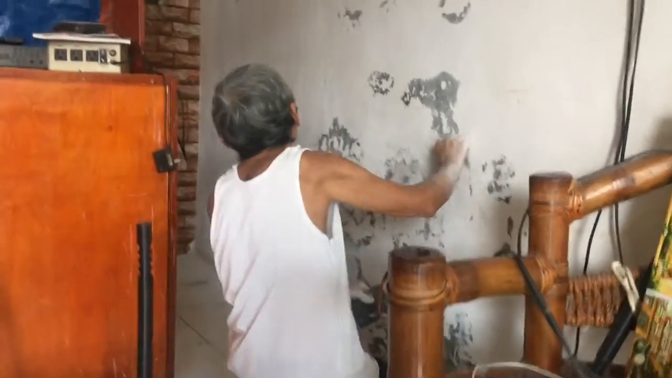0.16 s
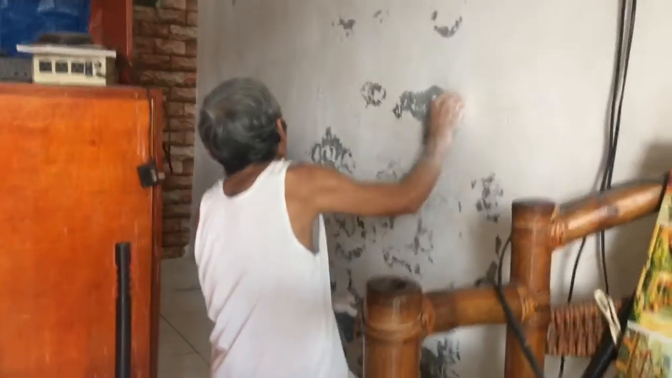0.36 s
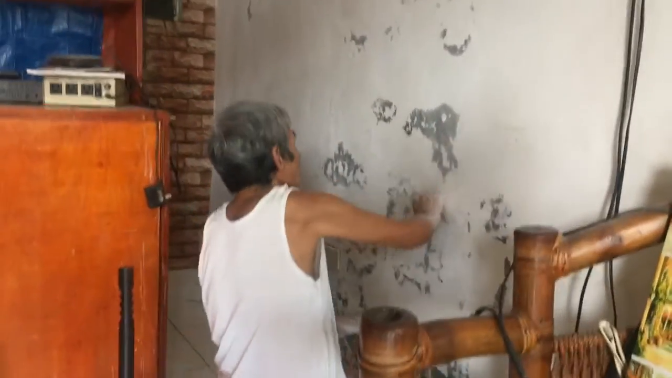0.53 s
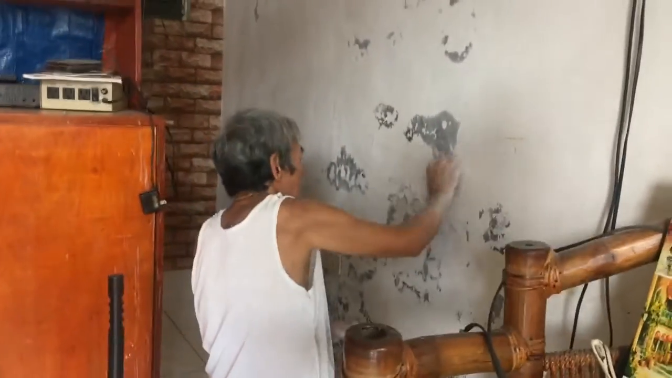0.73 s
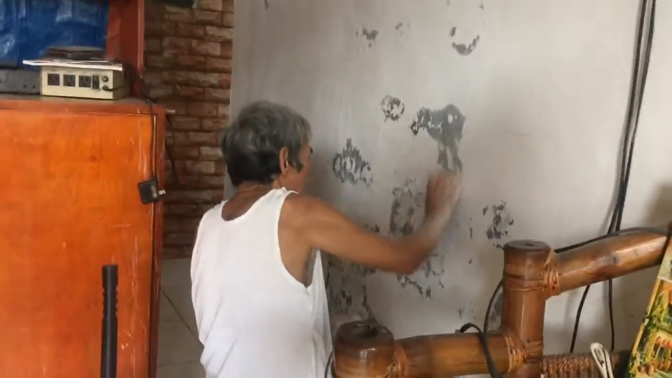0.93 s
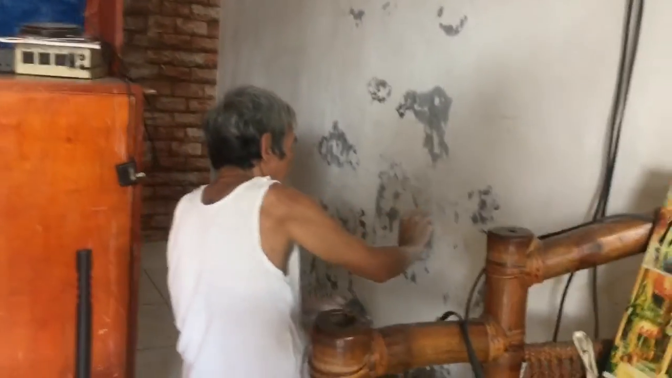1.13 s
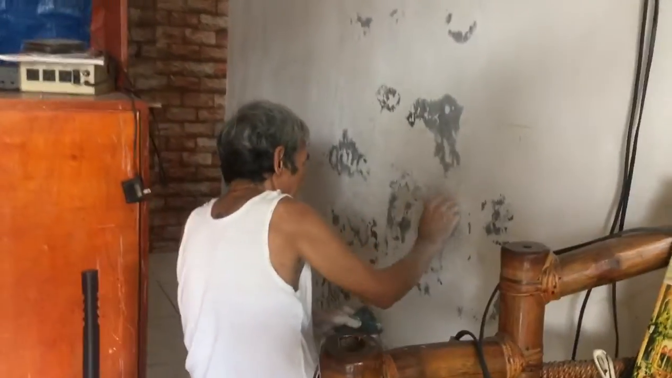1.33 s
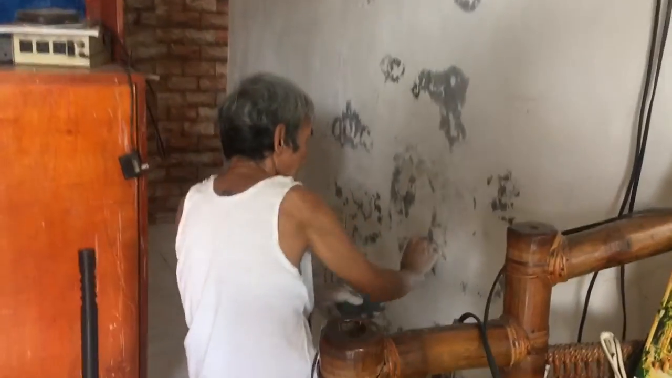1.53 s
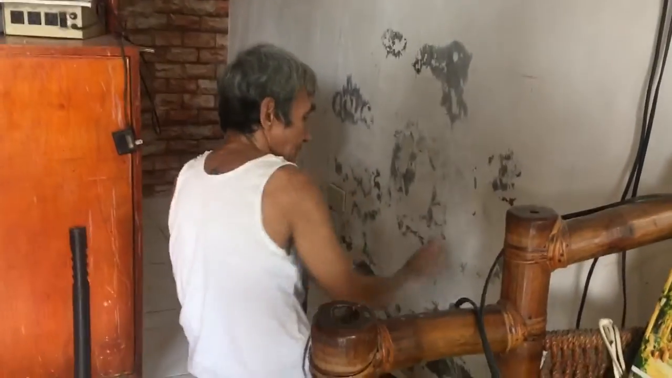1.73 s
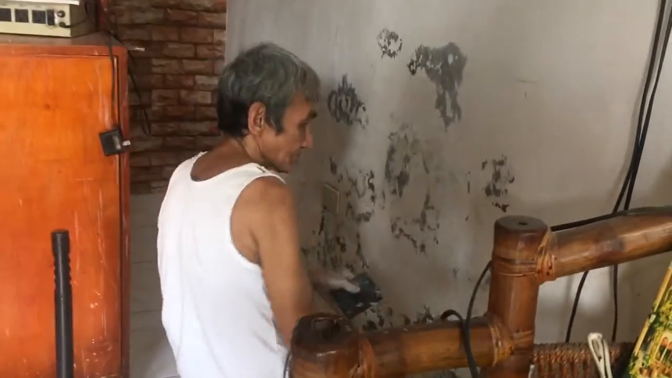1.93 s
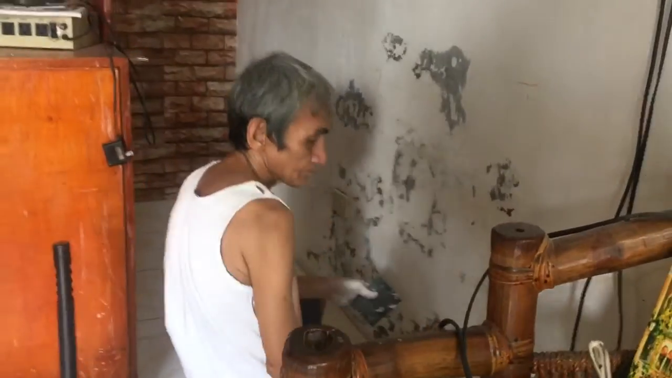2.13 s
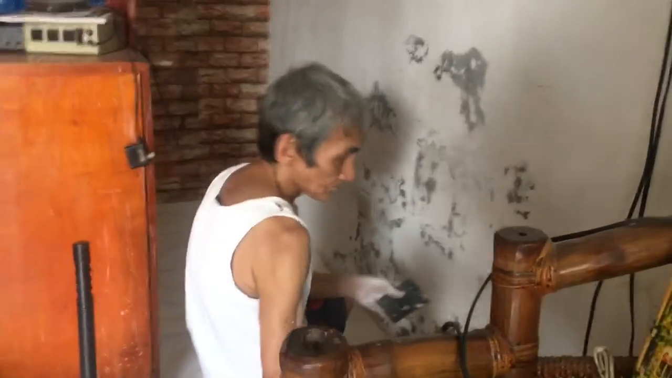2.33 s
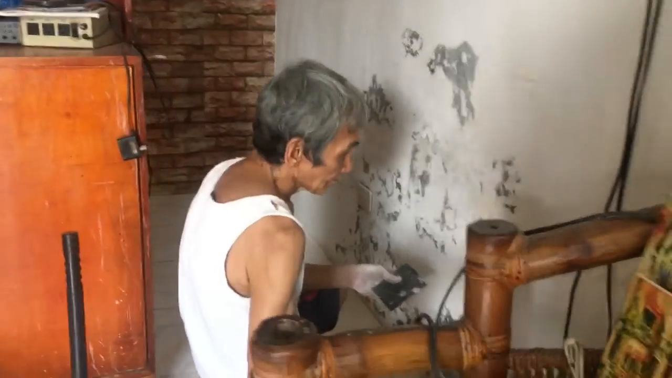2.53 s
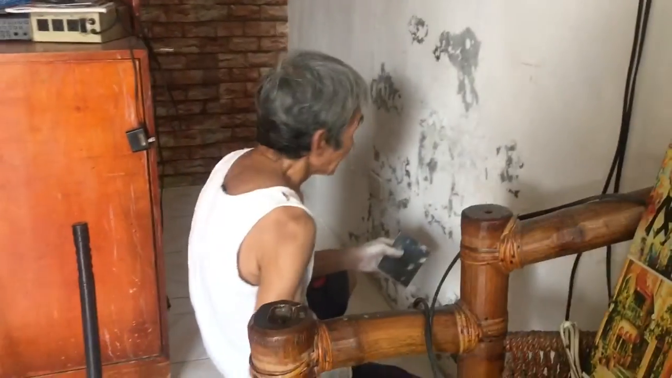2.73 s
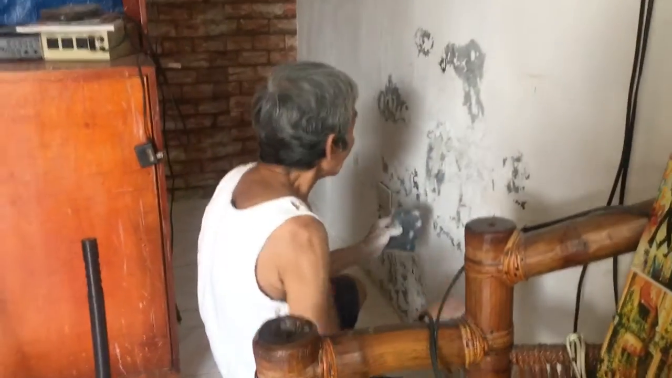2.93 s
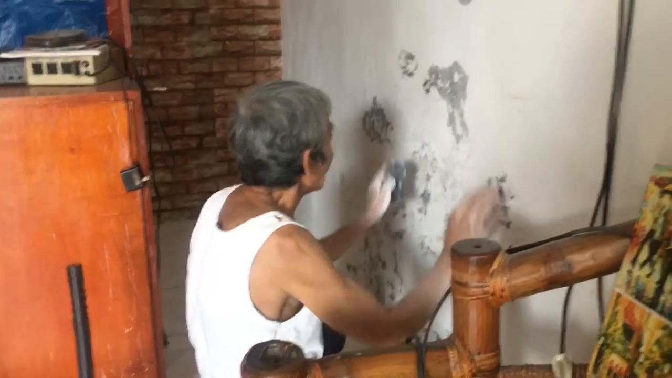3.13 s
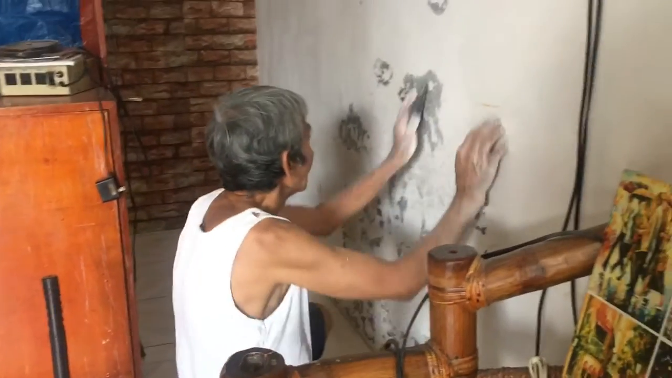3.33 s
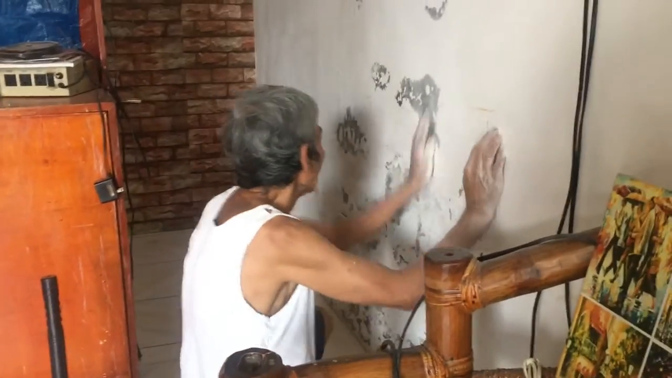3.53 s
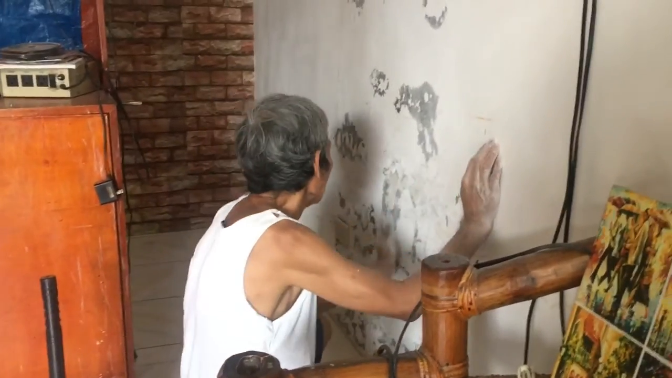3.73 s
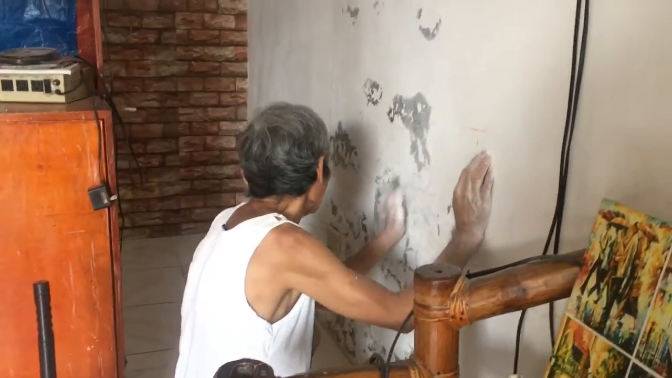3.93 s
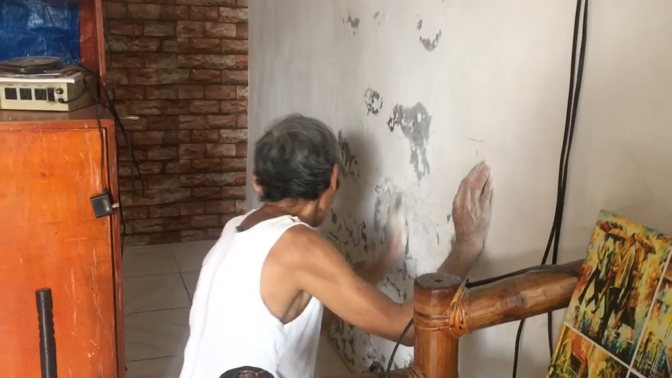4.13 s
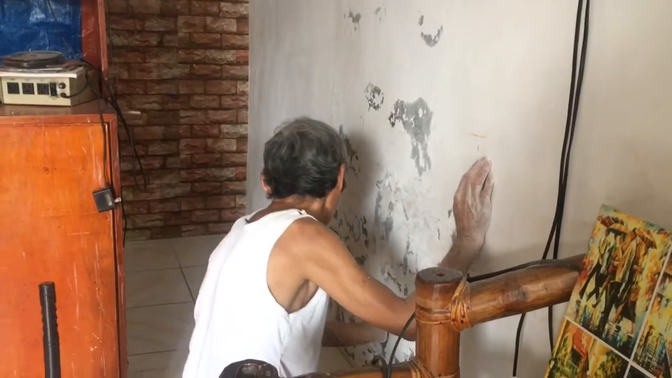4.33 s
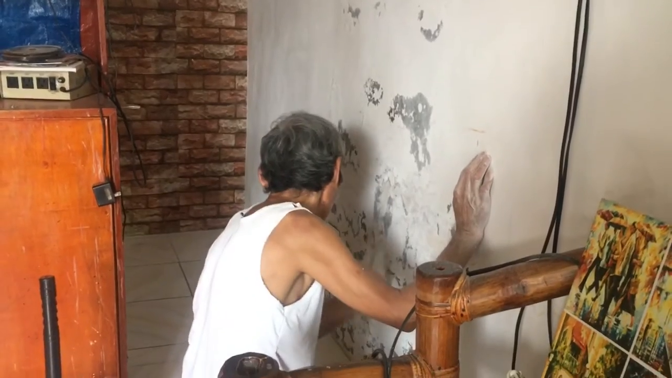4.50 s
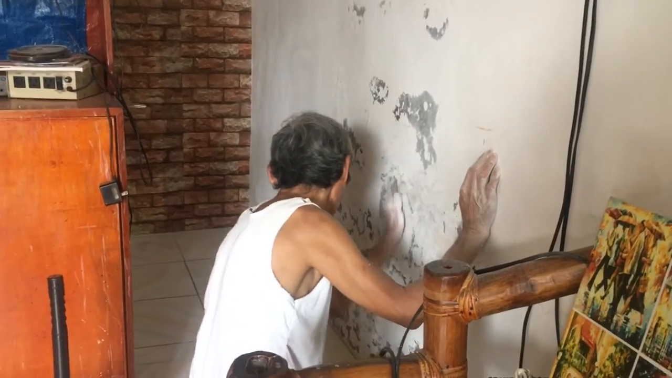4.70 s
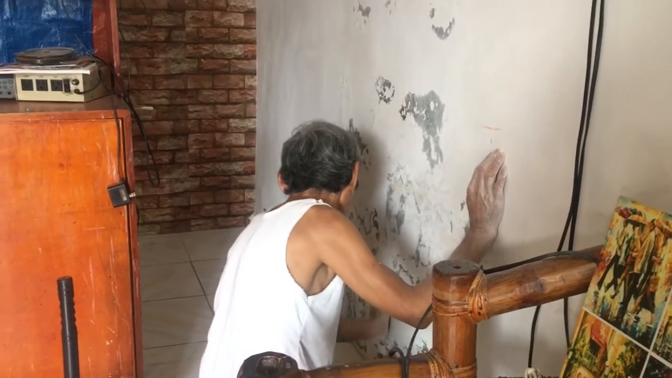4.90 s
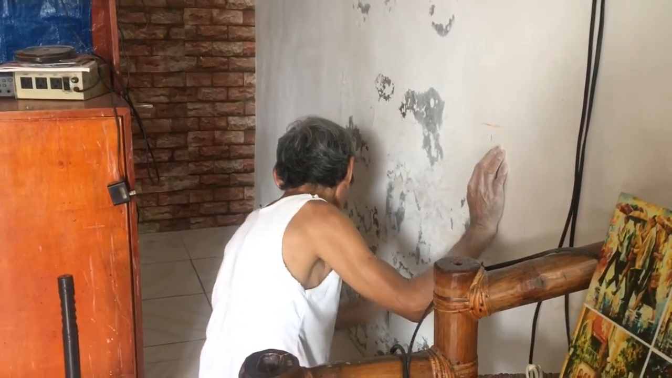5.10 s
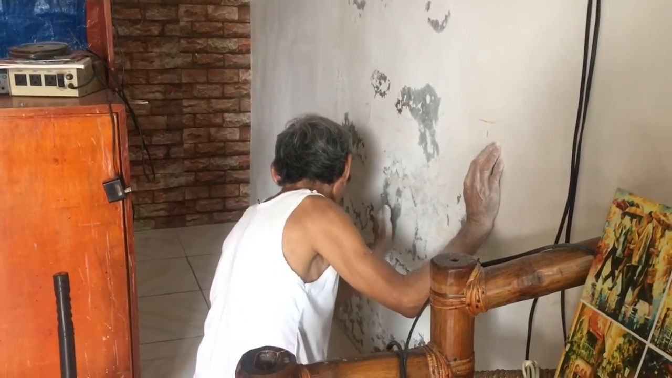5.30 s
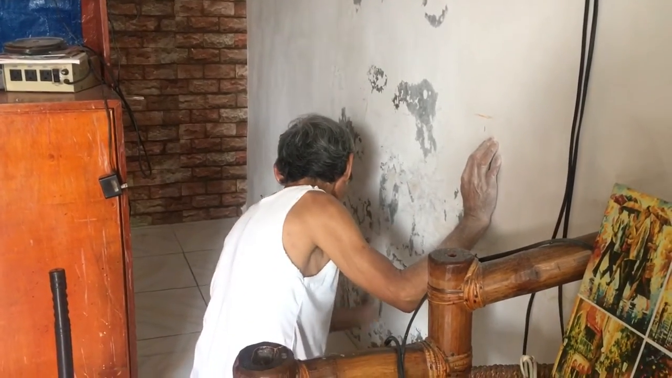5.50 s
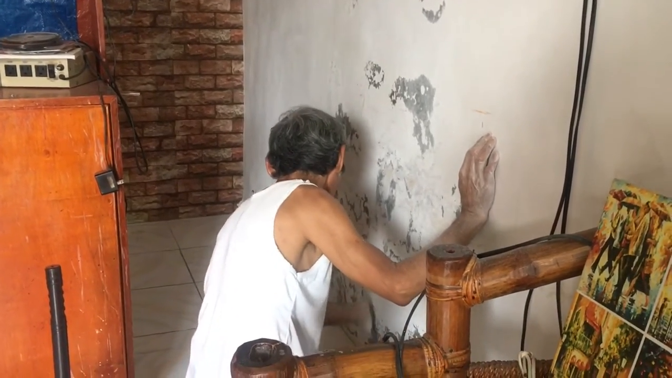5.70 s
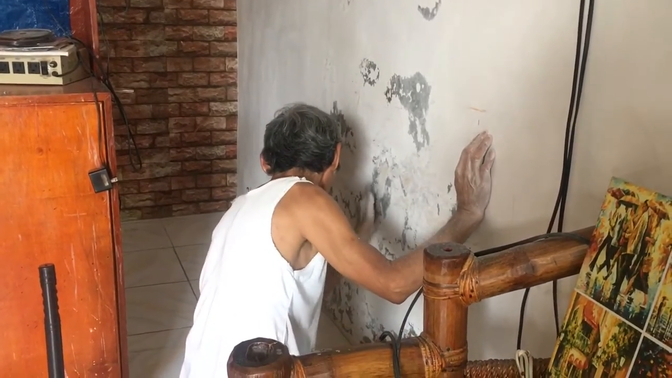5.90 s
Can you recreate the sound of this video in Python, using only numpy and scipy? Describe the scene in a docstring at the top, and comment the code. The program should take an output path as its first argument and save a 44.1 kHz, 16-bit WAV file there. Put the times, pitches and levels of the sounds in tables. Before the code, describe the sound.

In a small, hard room, a steel scraper makes short pushes across a plaster wall, catching and cracking off flakes of paint. After a pause it is set down on floor tiles with a clink and a brief ringing slide. Following a soft rustle, sandpaper hisses across the wall in quick, gritty strokes, louder than the scraping. One microphone picks it all up, with a dull hum in the gaps.

```python
"""Scraping and sanding a wall

In a small, hard room a man strips loose paint from plaster with short pushes of a steel scraper: the
edge sticks and slips, flakes crack off. He sets it down with a clink and slides it aside, ringing.
Then sandpaper hisses up and down in quick strokes as its grit cuts. A dull hum fills the pauses."""
import sys
import numpy as np
from scipy import signal
from scipy.fft import rfft, irfft
from scipy.io import wavfile
from scipy.ndimage import uniform_filter1d

SR = 44100
rng = np.random.default_rng(int(sys.argv[2]) if len(sys.argv) > 2 else 0)


def put_to_file(sound):
    """Save the sound as 16-bit audio at rate SR, in the file named by the first command-line argument."""
    columns = np.atleast_2d(sound).T  # one column per channel
    safe = np.clip(columns, -1, 1)
    whole_steps = np.round(safe * 32767)
    wavfile.write(sys.argv[1], SR, whole_steps.astype(np.int16))


N = 262393
TIME = np.arange(N) / SR
FREQ_HZ = np.fft.rfftfreq(N, 1 / SR)

# Chipping and scratching. Each row, as in every spectrum here: frequency in Hz, relative density in dB.
CHIP_SPECTRUM = [(900, -16.5), (1900, 0.5), (3000, 0.5), (4000, 1.5), (4650, 7.5), (5500, 0), (6400, 2),
                 (7800, 0), (8600, 0.5), (10000, -2.5), (12200, -2.5), (14000, -8.5), (16000, -9)]
# Dull rasp of the plaster. Each row: frequency in Hz, density in dB.
PLASTER_SPECTRUM = [(200, -9.5), (450, -6), (750, 0), (1150, 2.5), (1600, 2), (3000, -36)]


def amp(db):
    """Decibels to gain."""
    return 10 ** (np.asarray(db) / 20)


def unit(x):
    """Scale to rms 1."""
    return x / np.sqrt(np.mean(x ** 2) + 1e-20)


def curve_at(points, hz):
    """Interpolate on a log-frequency axis."""
    point_hz, value = np.transpose(points)
    return np.interp(np.log(hz + 1), np.log(point_hz + 1), value)


def shaped_noise(gain):
    """Noise of rms 1, weighted by a gain over FREQ_HZ."""
    return unit(irfft(rfft(rng.standard_normal(N)) * gain, N))


def colour(x, spectrum):
    """Minimum-phase filter of unit energy."""
    hz = abs(np.fft.fftfreq(2048, 1 / SR))
    log_gain = np.log(amp(curve_at(spectrum, hz)))
    taps = np.fft.ifft(np.exp(np.conj(signal.hilbert(log_gain)))).real
    return signal.oaconvolve(x, taps / np.linalg.norm(taps))[:len(x)]


def ring(x, hz, width_hz):
    """One resonance; white noise keeps its power."""
    r = np.exp(-np.pi * width_hz / SR)
    zeros = np.sqrt((1 - r * r) / 2) * np.array([1, 0, -1])
    return signal.lfilter(zeros, [1, -2 * r * np.cos(2 * np.pi * hz / SR), r * r], x)


def grains(per_s, spread_db):
    """Train of tiny fractures of uneven size, rms 1."""
    size = amp(spread_db * np.minimum(rng.exponential(1, N), 4))
    return unit(size * rng.choice([-1, 1], N) * (rng.random(N) < per_s / SR))


def judder(hz, depth_db):
    """Uneven contact: a random gain that changes about hz times a second."""
    return unit(amp(depth_db * shaped_noise(1 / (1 + (FREQ_HZ / hz) ** 4))))


def swell(rows):
    """Gain from rows of time in s and level in dB; silent outside them."""
    at_s, db = np.transpose(rows)
    inside = (TIME >= at_s[0]) & (TIME <= at_s[-1])
    return uniform_filter1d(amp(np.interp(TIME, at_s, db)) * inside, size=90)


def burst(start_s, decay_s):
    """Envelope of a sudden contact that dies away."""
    age_s = TIME - start_s
    return (age_s >= 0) * np.exp(-np.clip(age_s / decay_s, 0, 40))


def hump(centre_s, half_s):
    """Gaussian bump of height 1."""
    return np.exp(-((TIME - centre_s) / half_s) ** 2)


def movement(start_s, length_s, attack_s, release_db_per_s):
    """Gain of one hand movement: ease in, hold, die away."""
    age_s = TIME - start_s
    attack = np.exp(-np.minimum(age_s / attack_s - 1, 0) ** 2)
    return attack * amp(-release_db_per_s * np.maximum(age_s - length_s, 0))


def ambience(wash_db=-40.25):
    """Steady dull wash with a few wavering hum tones."""
    # Each row: frequency in Hz, density in dB.
    wash_spectrum = [(30, -17), (55, 0), (75, -14), (100, -9), (130, -5.5), (170, -9), (240, -6.5),
                     (400, -12), (1050, -11.5), (1600, -14), (2800, -27), (4500, -33), (9000, -41),
                     (16000, -51)]
    # Each row: centre in Hz, width in Hz, level in dB.
    hum_bands = [(52, 5.5, -56), (127, 40, -55.5), (227, 58, -56), (305.4, 1.2, -57.5)]
    wash = amp(wash_db) * shaped_noise(amp(curve_at(wash_spectrum, FREQ_HZ)))
    hum = sum(amp(db) * shaped_noise(np.exp(-2 * ((FREQ_HZ - hz) / width_hz) ** 2))
              for hz, width_hz, db in hum_bands)
    return wash + hum


def pushes(blade_share=0.3, plaster_share=0.48):
    """Gains of drag, chipping and digging; in each push the edge bites deeper once."""
    # Each row: start in s, length in s, drag, chipping and digging in dB, bite delay in s,
    # extra chipping at the bite in dB.
    push_rows = [(-0.06, 0.047, -22.5, -34.5, -58, 0.043, 8), (0.071, 0.14, -28, -34, -47, 0.13, 1),
                 (0.376, 0.094, -25.5, -25, -47, 0.065, 4), (0.49, 0.14, -31.5, -39, -59, 0.02, 8),
                 (0.638, 0.11, -39, -40, -64, 0.053, 1), (0.86, 0.087, -31, -36.5, -55, 0.007, 2.5),
                 (0.941, 0.095, -27.5, -38.5, -40, 0.029, 12.5),
                 (1.155, 0.088, -26, -38, -34.5, 0.065, 6.5), (1.324, 0.14, -27, -38.5, -37.5, 0.064, 4)]
    gains = []
    for start_s, length_s, drag_db, chip_db, dig_db, delay_s, extra_db in push_rows:
        bite_db = extra_db * hump(start_s + delay_s, half_s=0.026)
        force = movement(start_s, length_s, attack_s=0.0097, release_db_per_s=158)
        levels_db = [drag_db + blade_share * bite_db, chip_db + bite_db, dig_db + plaster_share * bite_db]
        gains.append(force * amp(levels_db))
    return np.max(gains, axis=0)


def scraper(dragging, chipping, chip_db=-1, catch_db=-1):
    """The edge sticks and slips over the paint; slips shake the blade while flakes crack off."""
    # Hand-damped blade on the wall. Each row: frequency in Hz, density in dB.
    blade_spectrum = [(200, -20), (500, -30), (800, -28), (1100, -7.5), (1320, -2.5), (1550, -4.5),
                      (1850, 3), (2200, 4), (2600, 0.5), (3100, -6), (4000, -10.5), (6500, -17),
                      (12000, -50)]
    # The edge lands or catches on a ridge. Each row: time in s, relative level in dB, chip offset in dB.
    catches = [(.3895, -17, -8), (0.402, -18.5, 6.5), (.4125, -14.5, 3), (0.436, -26, 11),
               (0.442, -23.5, 13), (0.864, -24, -3), (0.871, -22.5, 0), (0.948, -18, -8), (0.999, -15, -16),
               (1.162, -25, -13), (1.192, -23, -13), (1.332, -25, -21), (1.358, -22, -3), (1.413, -16, -18)]
    contact = judder(hz=110, depth_db=1)
    drag = contact * dragging
    chip = amp(chip_db) * contact * chipping
    for at_s, db, offset_db in catches:
        snag = amp(db + catch_db) * burst(at_s, decay_s=0.0017)
        drag += snag
        chip += snag * amp(offset_db)
    slips, flakes = grains(per_s=5000, spread_db=2.5), grains(per_s=12000, spread_db=3)
    return colour(drag * slips, blade_spectrum) + colour(chip * flakes, CHIP_SPECTRUM)


def plaster(digging):
    """The wall gives a dull rasp under the blade and short knocks under the hand."""
    # The hand bumps the wall. Each row: time in s, level in dB.
    bumps = [(3.393, -21.5), (3.58, -9.5), (5.036, -17)]
    # Each row: frequency in Hz, density in dB.
    bump_spectrum = [(150, -14), (400, 0), (900, -8), (1500, 5), (2100, 5), (3500, -33), (8000, -34)]
    rasp = digging * grains(per_s=2500, spread_db=5)
    knocks = sum(amp(db) * burst(at_s, decay_s=0.0014) for at_s, db in bumps) * rng.standard_normal(N)
    return colour(rasp, PLASTER_SPECTRUM) + colour(knocks, bump_spectrum)


def handling():
    """Paper and hands brush about; he leans down with a scuff, then shifts his weight to the wall."""
    # Each row: start in s, length in s, level in dB.
    brushes = [(2.175, 0.025, -52.5), (3.15, 0.025, -51), (3.316, 0.075, -36)]
    # Each row: time in s, level in dB.
    scuff_levels = [(2.27, -56), (2.31, -38.5), (2.345, -40.5), (2.39, -49), (2.44, -56)]
    body_levels = [(2.9, -53), (3.05, -41), (3.25, -53), (3.45, -44), (3.55, -60)]
    # Each row: frequency in Hz, density in dB.
    brush_spectrum = [(900, -0.5), (1600, -1), (2800, -5.5), (4900, -7.5), (6500, -4.5), (9300, -8),
                      (16000, -15)]
    scuff_spectrum = [(700, -15), (1600, 2), (2500, 0.5), (4300, -3.5), (5500, -12), (16000, -29)]
    body_spectrum = [(45, 2), (90, 1), (200, -18), (350, -6), (700, -15), (1300, -5), (3000, -43)]
    brushing = sum(amp(db) * movement(start_s, length_s, attack_s=0.012, release_db_per_s=220)
                   for start_s, length_s, db in brushes)
    crinkle = judder(hz=90, depth_db=2.5) * grains(per_s=4300, spread_db=4)
    brush = colour(brushing * crinkle, brush_spectrum)
    scuff = colour(swell(scuff_levels) * crinkle, scuff_spectrum)
    rustle = swell(body_levels) * judder(hz=12, depth_db=8) * rng.standard_normal(N)
    return brush + scuff + colour(rustle, body_spectrum)


def blade_set_down(ring_db=-1, scratch_db=-9, rumble_db=-19, slide_db_per_octave=1):
    """The handle knocks and drags; taps and a short slide on the tiles set the free blade ringing."""
    # Steel blade, damped by the floor. Each row: frequency in Hz, width in Hz, relative level in dB.
    steel_modes = [(1113, 60, -6), (1334, 66, -7), (1738, 28, -6), (2346, 50, -3.5), (3080, 54, -3),
                   (3275, 62, 0), (3480, 8.1, 0), (3830, 58, -6), (4240, 73, -7), (5250, 41, 1),
                   (5400, 89, -2.5), (5620, 58, 1), (5980, 49, -8), (6370, 71, -7), (6850, 100, -10),
                   (7470, 100, -10), (7700, 80, -12), (8160, 90, 2.5), (8340, 66, -12), (8500, 100, -10),
                   (9260, 280, -6), (10840, 200, -7), (11700, 160, -5), (12600, 100, -6), (13500, 200, -16),
                   (14700, 200, -16)]
    # Blade taps. Each row: time in s, level in dB, contact decay in s, tilt in dB per octave.
    taps = [(2.442, -27.5, 0.056, -0.5), (2.486, -31.5, 0.052, -19), (2.609, -23, 0.015, 1)]
    # Each row: time in s, level in dB.
    slide_levels = [(2.61, -32), (2.65, -31), (2.67, -24.5), (2.782, -30.5), (2.84, -45)]
    # Each row: frequency in Hz, level in dB, T60 in s.
    handle_modes = [(231, -41, 0.83), (410, -36, 0.14), (630, -40, 0.31), (1145, -29.5, 0.32),
                    (1293, -23.5, 0.088), (2560, -27.5, 0.056)]
    octaves = np.log2(np.maximum(FREQ_HZ, 700) / 5000)
    slide = swell(slide_levels) * judder(hz=80, depth_db=1)
    contacts = [(amp(db) * burst(at_s, decay_s), tilt) for at_s, db, decay_s, tilt in taps]
    contacts.append((slide, slide_db_per_octave))
    force = sum(gain * shaped_noise(amp(tilt * octaves)) for gain, tilt in contacts)
    ringing = sum(amp(db) * ring(force, hz, width_hz) for hz, width_hz, db in steel_modes)
    ringing /= np.linalg.norm([amp(db) for _, _, db in steel_modes])
    land_s = taps[0][0]
    knock = sum(amp(db) * burst(land_s, t60_s / np.log(1000)) * np.sin(2 * np.pi * hz * (TIME - land_s))
                for hz, db, t60_s in handle_modes)
    rumble = amp(rumble_db) * ring(slide * rng.standard_normal(N), hz=228, width_hz=55)
    return amp(ring_db) * ringing + amp(scratch_db) * colour(force, CHIP_SPECTRUM) + knock + rumble


def strokes(grit_sag_db_per_s=3.5, treble_db=2.5, treble_sag_db_per_s=22, rub_surge_db=-1):
    """Gains of grit, treble, rub and drag; each stroke surges once and dulls as the hand slows."""
    # Each row: start in s, length in s, grit in dB, palm rub in dB, rub slope in dB per s,
    # plaster drag in dB, surge delay in s, extra grit and extra treble at the surge in dB.
    stroke_rows = [(3.444, 0.19, -14.5, -21, -15, -44, 0.084, 8, 1),
                   (3.567, 0.15, -14.5, -22, -17, -38, 0.11, 0.5, 5.5),
                   (3.81, 0.12, -15.5, -24.5, 43, -45, 0.085, 5, 1),
                   (4.046, 0.25, -16.5, -25, 2, -56, 0.12, 6.5, 7),
                   (4.435, 0.16, -16.5, -23, -7, -40, 0.125, 4.5, 2),
                   (4.669, 0.26, -16, -25, 10, -54, 0.082, 5, 3.5),
                   (5.038, 0.2, -18, -18.5, -35, -29.5, 0.2, 0, 5),
                   (5.311, 0.24, -18, -26.5, 9, -37, 0.035, 1.5, 9.5),
                   (5.686, 0.19, -20.5, -23, -22, -34.5, 0.058, 2, -1)]
    gains = []
    for start_s, length_s, grit_db, rub_db, lean, drag_db, delay_s, surge_db, bright_db in stroke_rows:
        age_s = np.clip(TIME - start_s, 0, length_s)
        surge = hump(start_s + delay_s, half_s=0.04)  # fastest part; the palm presses less
        motion = movement(start_s, length_s, attack_s=0.051, release_db_per_s=154)
        cut = amp(grit_db + surge_db * surge - grit_sag_db_per_s * age_s)
        treble = cut * amp(treble_db + bright_db * surge - treble_sag_db_per_s * age_s) * motion ** 0.51
        rub = amp(rub_db + lean * age_s + rub_surge_db * surge)
        gains.append([motion * cut, motion * treble, motion * rub, motion * amp(drag_db)])
    return np.max(gains, axis=0)


def sandpaper(hiss_db=0.5, drag_db=-4):
    """Grit cuts the plaster, brighter with speed; the pressed sheet rasps, and sings on stroke one."""
    # Each row: frequency in Hz, density in dB.
    grit_spectrum = [(1300, -41), (2300, -16), (2850, -9), (3500, -4), (4500, -0.5), (5800, 0.5),
                     (6900, 0.5), (7600, -2.5), (9100, -1), (10000, -5), (11500, -3), (13000, -5),
                     (14300, -9), (16000, -10)]
    sheet_spectrum = [(600, -37), (1100, -18.5), (1500, -8), (1900, -6), (2300, -1), (2750, -7.5),
                      (3600, -5.5), (6000, -53.5)]
    # Each row: frequency in Hz, width in Hz, relative level in dB.
    sheet_modes = [(1420, 85, -3), (2700, 140, 1.5), (3700, 190, -22), (5670, 300, 3), (7000, 250, 4),
                   (8950, 270, -1)]
    # Each row: time in s, level in dB.
    song_levels = [(3.42, -33), (3.46, -16.5), (3.51, -15), (3.55, -29), (3.59, -42)]
    cutting, treble, rubbing, dragging = strokes()
    contact = judder(hz=110, depth_db=0.5)
    grit = colour(grains(per_s=32000, spread_db=2), grit_spectrum)
    fine = signal.sosfiltfilt(signal.butter(2, 9800, "high", fs=SR, output="sos"), grit)
    coarse = signal.sosfiltfilt(signal.butter(3, 4900, "low", fs=SR, output="sos"), grit)
    speed = (treble / (cutting + 1e-12)).clip(0.2) ** 0.68  # trades coarse grains for fine
    hiss = amp(hiss_db) * cutting * (grit + (speed - 1) * fine + (speed ** -0.7 - 1) * coarse)
    rasp = rubbing * colour(grains(per_s=4000, spread_db=-0.5), sheet_spectrum)
    drag = amp(drag_db) * dragging * colour(grains(per_s=2500, spread_db=2.5), PLASTER_SPECTRUM)
    friction = grains(per_s=13000, spread_db=1.5)
    song = unit(sum(amp(db) * ring(friction, hz, width_hz) for hz, width_hz, db in sheet_modes))
    return contact * (hiss + rasp + drag + swell(song_levels) * song)


def echoes(early_db, tail_db, early_per_s=2000, early_decay_s=0.003):
    """Near walls answer within milliseconds; then a short tail, duller as it dies."""
    # Room decay. Each row: frequency in Hz, T60 in s.
    room_t60 = [(200, 0.37), (2000, 0.7), (5000, 0.54), (9000, 0.46), (16000, 0.44)]
    t = TIME[:SR // 2]
    hz, age_s, bands = signal.stft(rng.standard_normal(len(t)), SR, nperseg=256)
    decay = np.exp(-np.log(1000) * age_s / curve_at(room_t60, hz)[:, None])
    tail = signal.istft(bands * decay, SR, nperseg=256)[1][:len(t)]
    early = rng.standard_normal(len(t)) * (rng.random(len(t)) < early_per_s / SR)
    early *= np.exp(-t / early_decay_s)
    return amp(early_db) * early / np.linalg.norm(early) + amp(tail_db) * tail / np.linalg.norm(tail)


def room(x, early_db, tail_db, block=4096):
    """The hand keeps moving, so the sound fades from one echo pattern to the next."""
    direct = np.pad(x, (block, SR))
    mix, window = direct.copy(), signal.windows.cosine(block)
    for start in range(0, N + block, block // 2):
        wet = signal.fftconvolve(direct[start:start + block] * window, echoes(early_db, tail_db))
        mix[start:start + len(wet)] += wet
    return mix[block:block + N] / np.linalg.norm([1, amp(early_db), amp(tail_db)])


def scene():
    """One microphone hears the room; the sanding is drier than the scraper: weaker echoes and tail."""
    dragging, chipping, digging = pushes()
    work = scraper(dragging, chipping) + blade_set_down() + plaster(digging) + handling()
    work = room(work, early_db=-4, tail_db=-2)
    sanding = room(sandpaper(), early_db=-10, tail_db=-6.5)
    mono = work + sanding + ambience()
    return np.array([mono, mono])


def record(dry, low_hz=37, high_hz=15770, threshold_db=-15, duck_share=0.44, recovery_db_per_s=4):
    """Microphone notches and bass cut, gain control that ducks loud strokes, peak limit, band limit."""
    # Each row: centre in Hz, width in Hz, gain in dB.
    mic_dips = [(4900, 330, -3.5), (10520, 400, -3.5)]
    mic_db = sum(db * np.exp(-2 * ((FREQ_HZ - hz) / width_hz) ** 2) for hz, width_hz, db in mic_dips)
    x = irfft(rfft(dry) * amp(mic_db), N)
    x = signal.sosfilt(signal.butter(6, low_hz, "high", fs=SR, output="sos"), x)
    power = signal.lfilter([1 / 600], [1, 1 / 600 - 1], x[0] ** 2)  # 14 ms average
    power_db = 10 * np.log10(power + 1e-12)
    held_db = np.maximum.accumulate(power_db + recovery_db_per_s * TIME) - recovery_db_per_s * TIME
    x = x * amp(-duck_share * np.maximum(held_db - threshold_db, 0))
    x = x / (1 + x ** 8) ** (1 / 8)  # soft peak limit
    lowpass = signal.firwin(1023, high_hz, window=("kaiser", 9), fs=SR)
    return signal.oaconvolve(x, lowpass[None], "same")


dry = scene()
out = record(dry)
put_to_file(out)
```